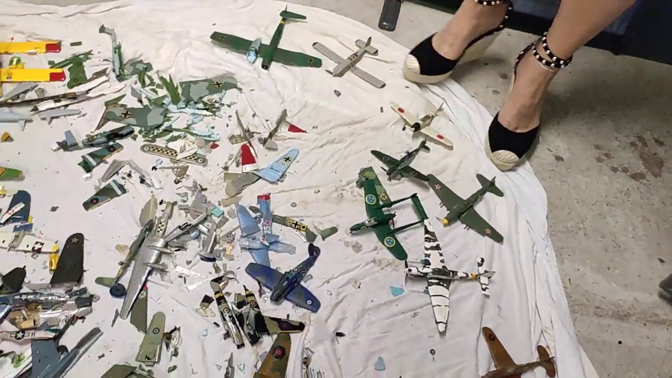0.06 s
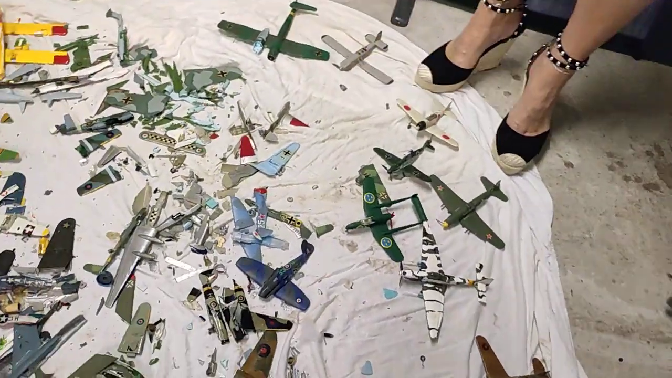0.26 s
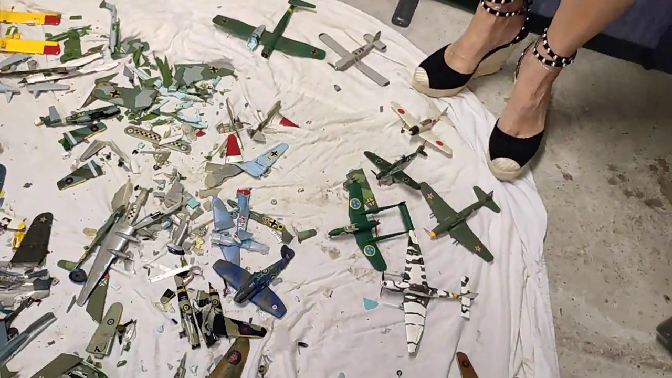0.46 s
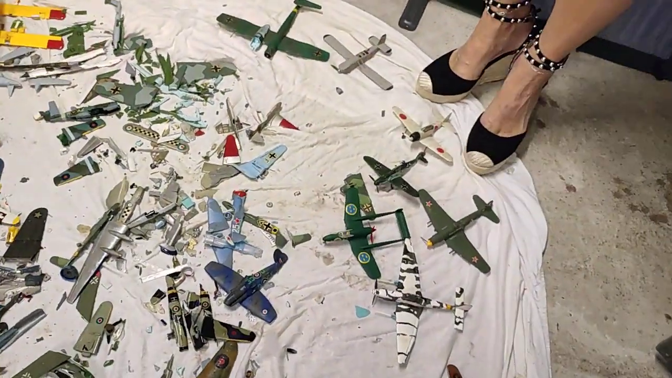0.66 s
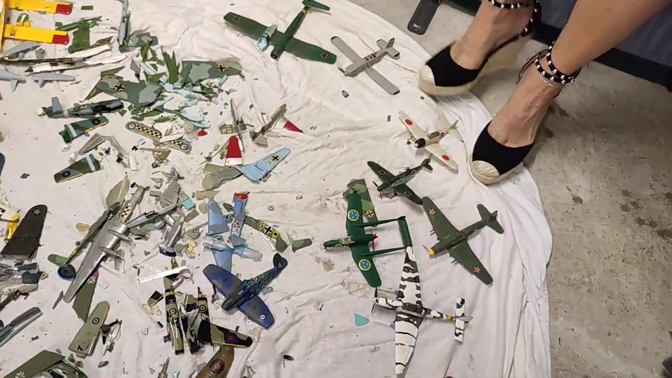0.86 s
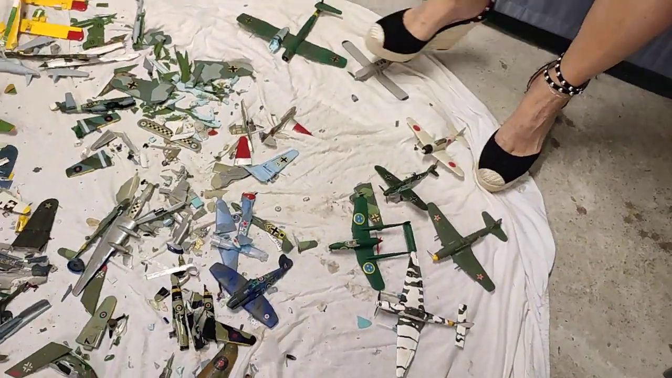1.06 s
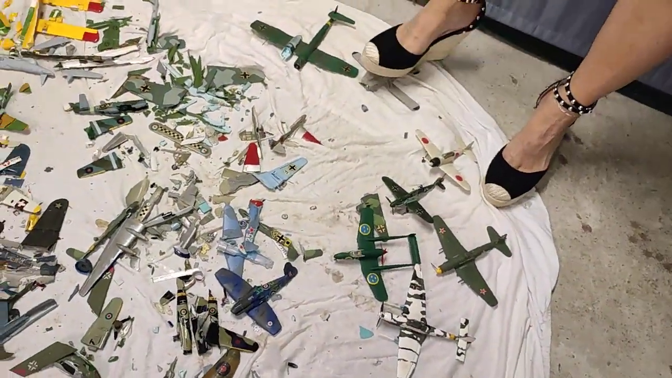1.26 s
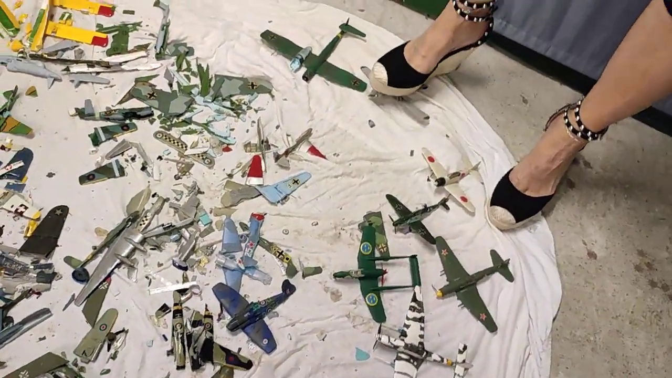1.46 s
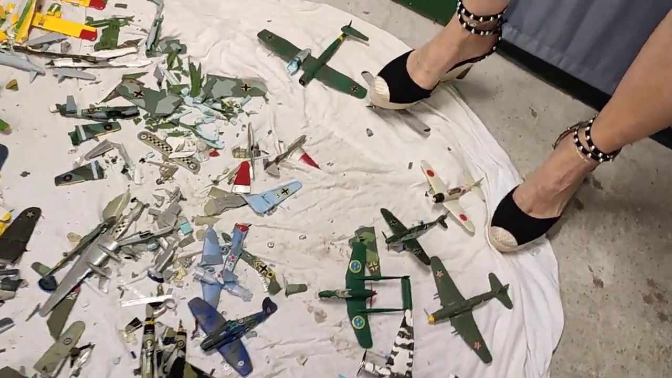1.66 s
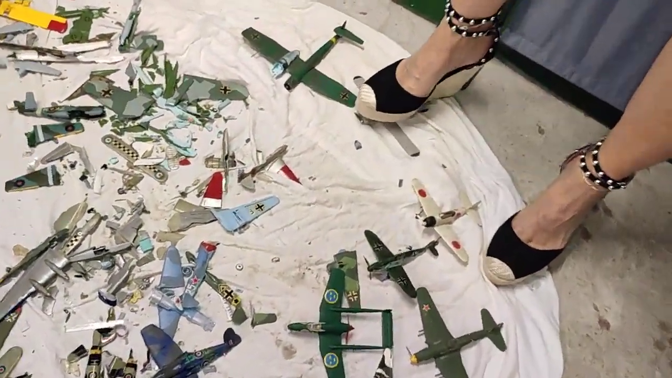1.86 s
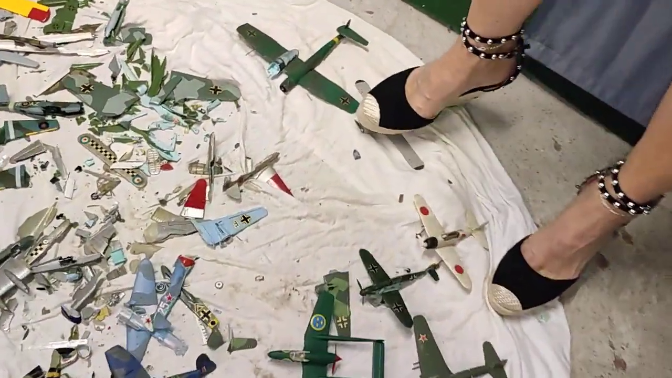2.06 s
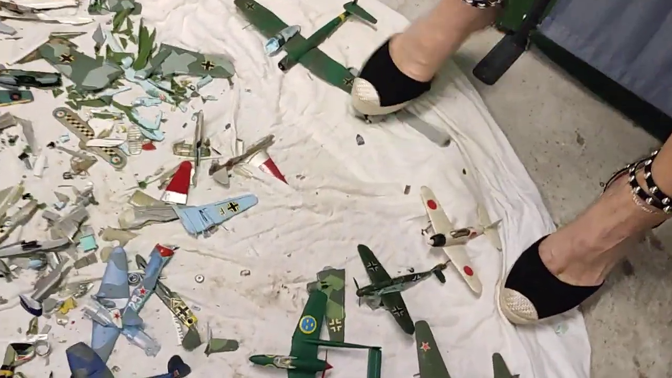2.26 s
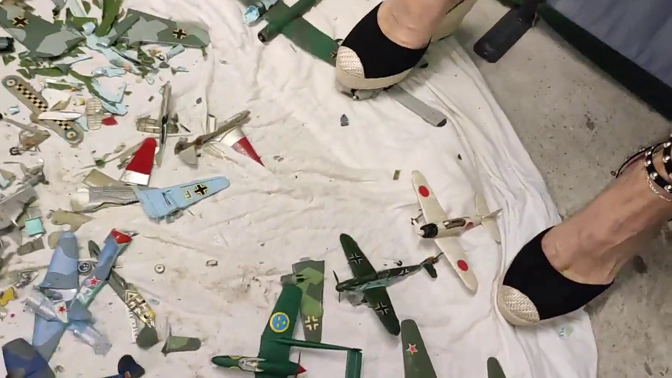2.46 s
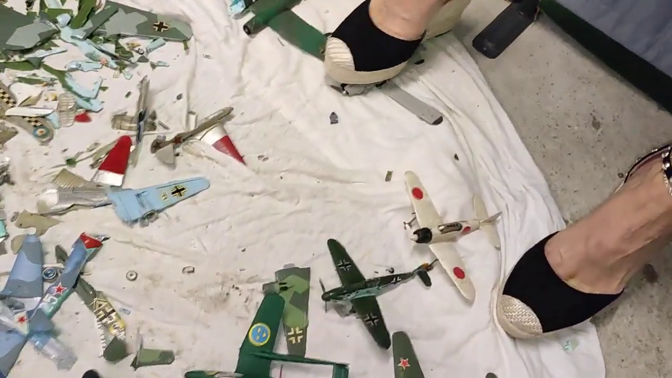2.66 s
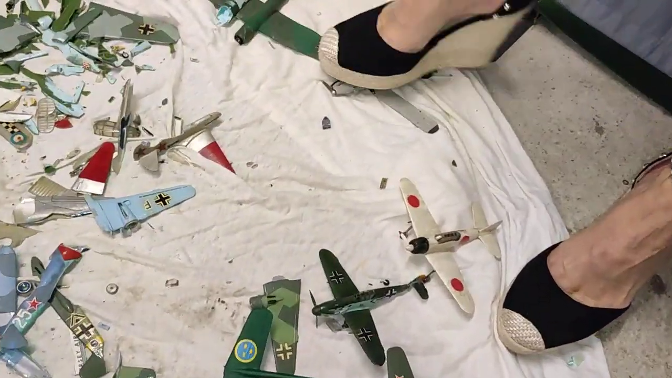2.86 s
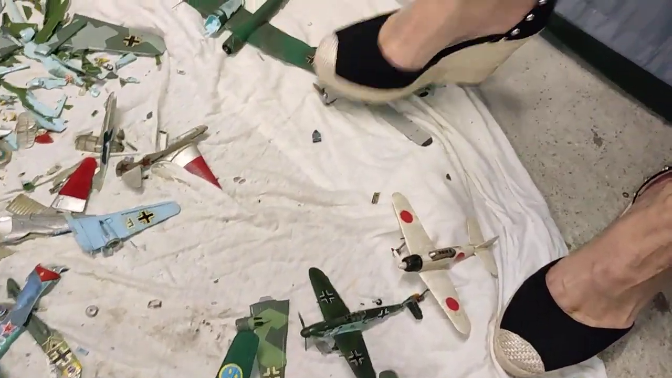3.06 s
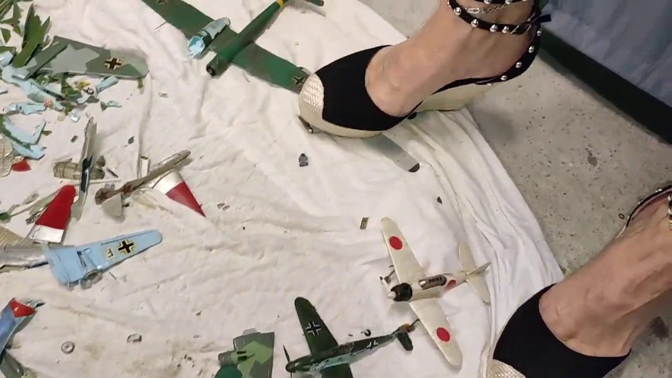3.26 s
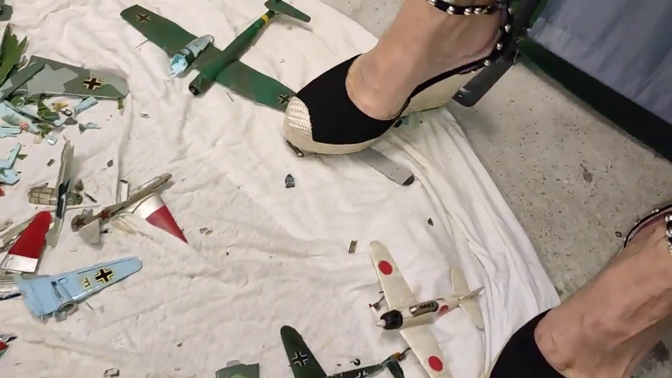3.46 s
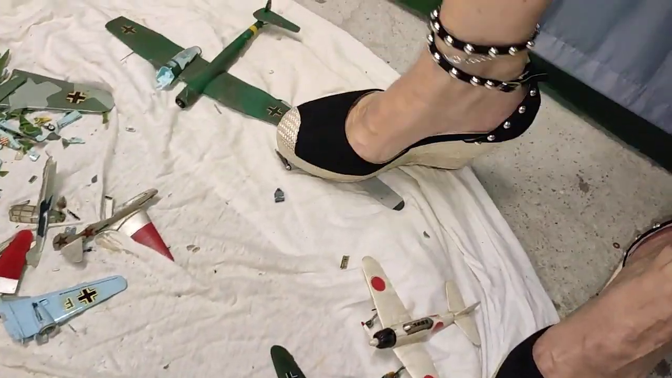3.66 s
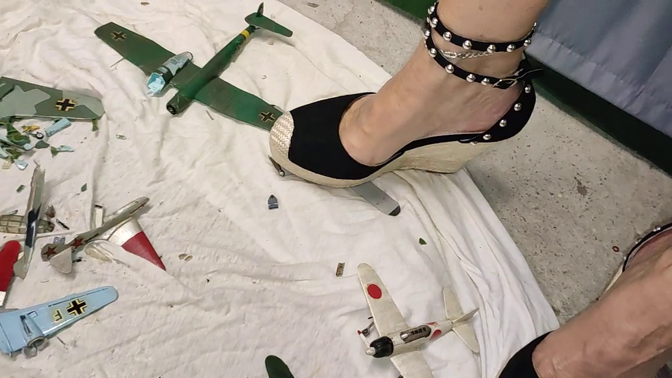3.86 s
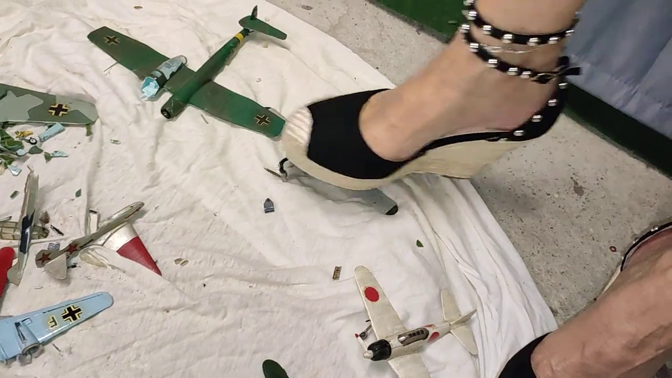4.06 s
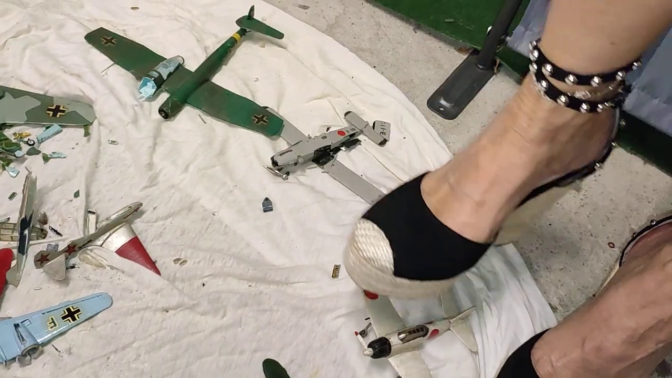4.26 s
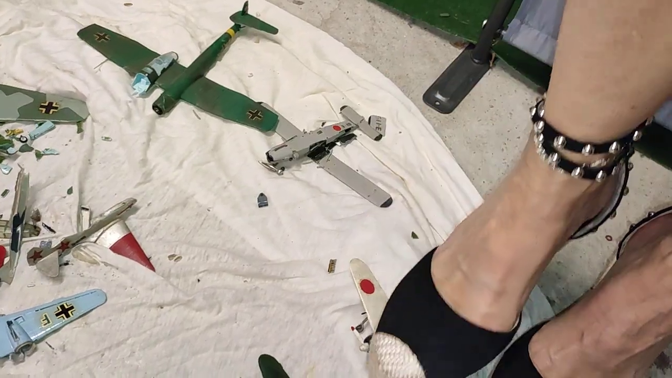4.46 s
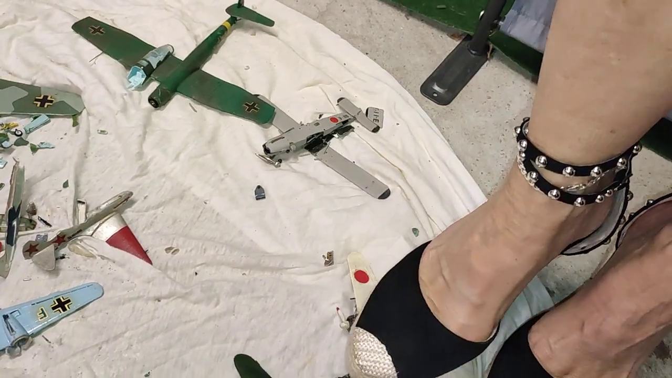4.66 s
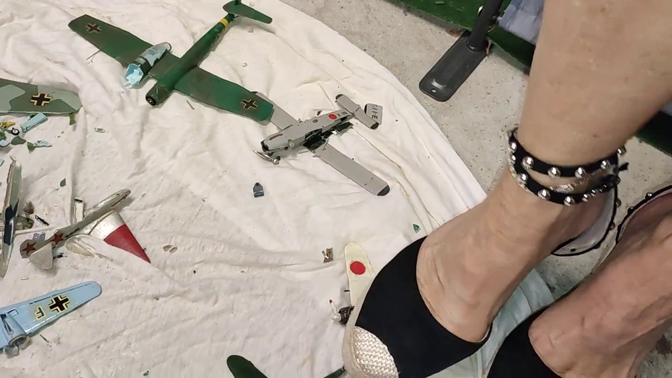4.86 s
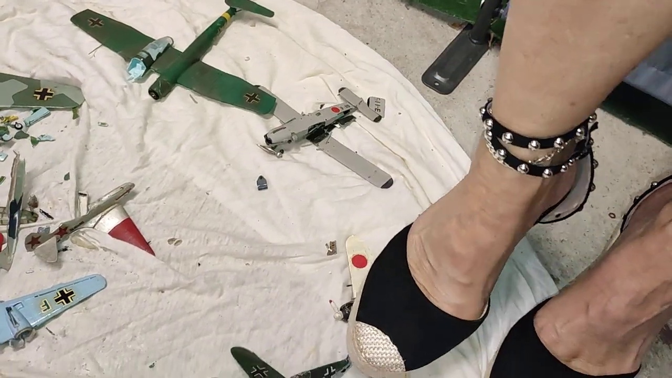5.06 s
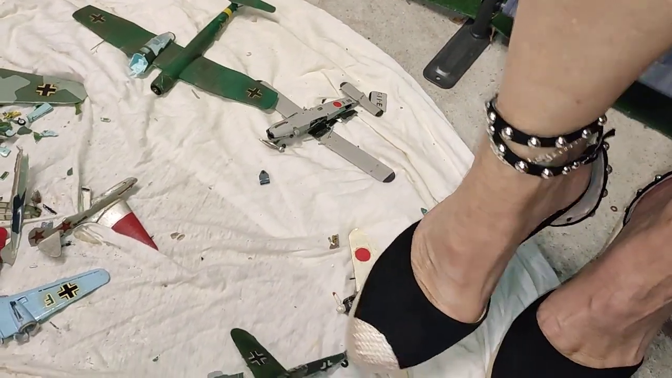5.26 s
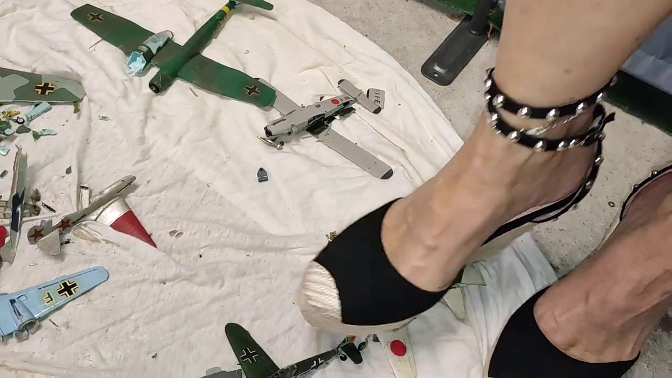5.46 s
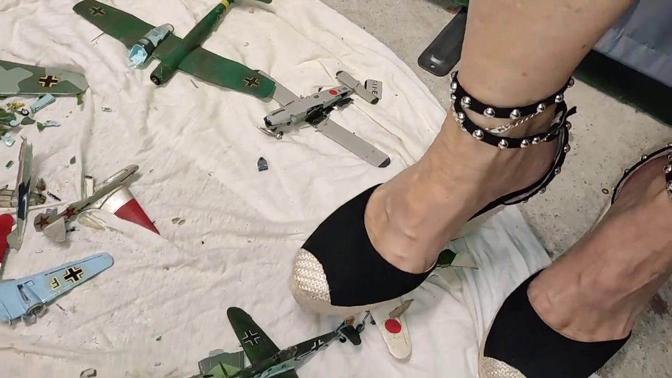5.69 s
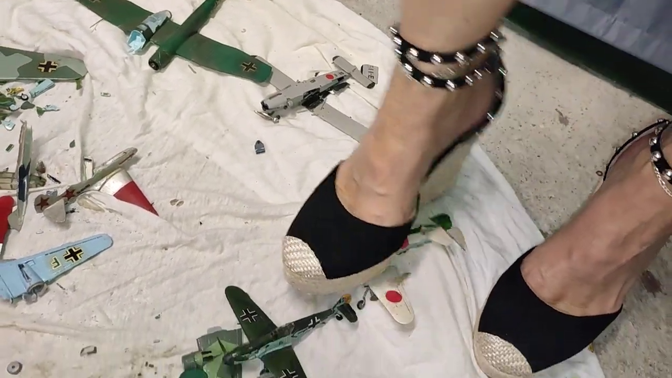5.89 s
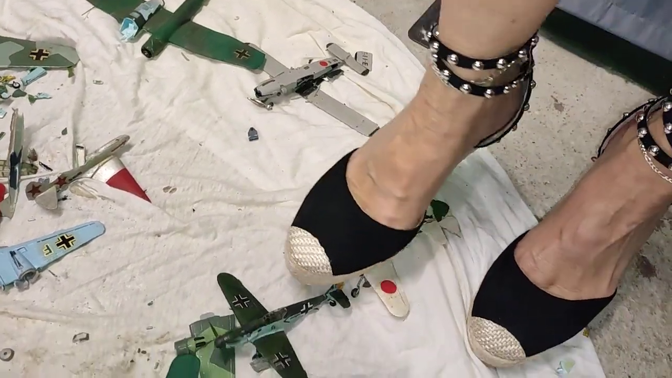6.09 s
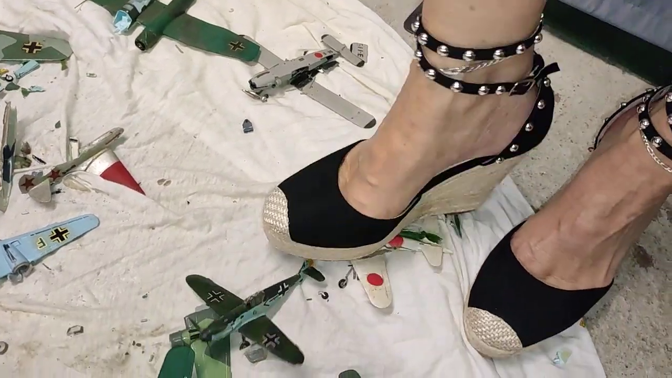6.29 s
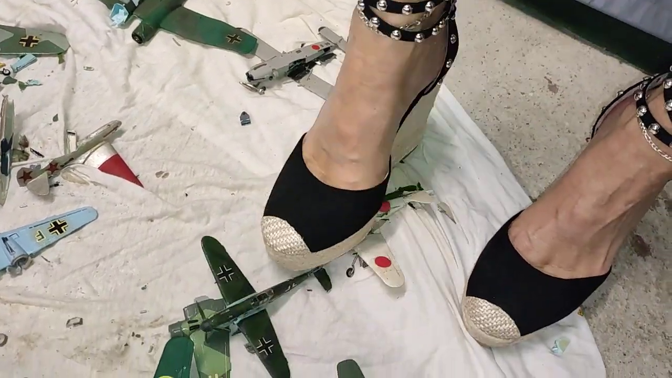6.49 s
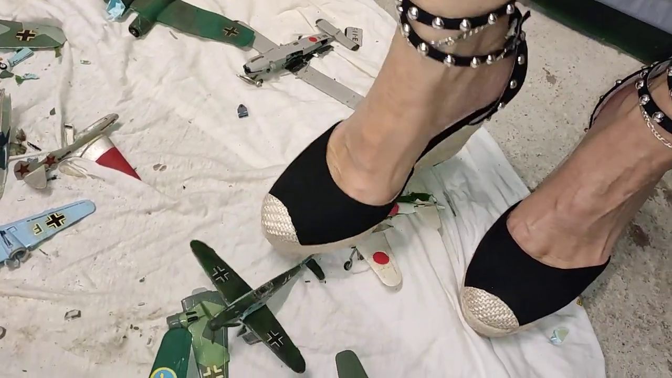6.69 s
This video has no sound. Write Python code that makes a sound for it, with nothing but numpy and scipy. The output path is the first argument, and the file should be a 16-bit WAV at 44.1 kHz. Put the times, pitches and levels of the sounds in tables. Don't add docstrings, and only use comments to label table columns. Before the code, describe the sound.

Soles shuffle gently over cloth and grit, then step hard on a plastic toy: dry snaps, a bright rip, low thumps. Shards tick and crumble as the pressure eases, fading nearly to nothing. A second toy is crushed with the sharpest crack of all, then scattered snaps and crunching. Small concrete room, close camera microphone with slightly different left and right colour, faint mains hum.

```python
import sys
import numpy as np
from scipy import signal
from scipy.fft import rfft, irfft, next_fast_len
from scipy.io import wavfile

SR = 44100
rng = np.random.default_rng(int(sys.argv[2]) if len(sys.argv) > 2 else 0)


def unload_audio(sound):
    columns = np.transpose(np.atleast_2d(sound))
    steps = np.round(np.clip(columns, -1, 1) * 32767)
    wavfile.write(sys.argv[1], SR, steps.astype(np.int16))


def ratio_of_db(decibels):
    return 10 ** (np.asarray(decibels, float) / 20)


N = 296793


def rms_one(x):
    return x / np.sqrt(np.mean(x ** 2) + 1e-20)


def energy(x):
    return np.sqrt(np.sum(x ** 2) + 1e-20)


def energies(x):
    ports = energy(x[:2])
    return np.array([[ports], [ports], [np.sqrt(2) * energy(x[2])]])


def in_time(rows):
    s, *columns = np.transpose(rows)
    return [np.interp(np.arange(N) / SR, s, c) for c in columns]


def at_hz(points, hz):
    table_hz, value = np.transpose(points)
    return np.interp(np.log(hz), np.log(table_hz), value)


def band(x, low_hz, high_hz):
    edges = signal.butter(2, [low_hz, high_hz], "band", fs=SR, output="sos")
    return signal.sosfilt(edges, x + 1e-18)


def port(x, resonances):
    for hz, width_hz, db in resonances:
        w, g = 2 * np.pi * hz / SR, ratio_of_db(db / 2)
        a = np.tan(np.pi * width_hz / SR)
        x = signal.lfilter([1 + a * g, -2 * np.cos(w), 1 - a * g],
                           [1 + a / g, -2 * np.cos(w), 1 - a / g], x)
    return x


def drift(rate_hz):
    r = np.exp(-2 * np.pi * rate_hz / SR)
    wander = signal.lfilter([1], [1, -2 * r, r * r], rng.standard_normal(N + SR))
    return rms_one(wander[SR:])


def at_both_ports(shared, own):
    alike_below_hz = 1550
    low = signal.butter(2, alike_below_hz, fs=SR, output="sos")
    high = signal.butter(2, alike_below_hz, "high", fs=SR, output="sos")
    return signal.sosfilt(low, shared + 1e-18) + signal.sosfilt(high, own + 1e-18)


def pair_noise(size):
    white = rng.standard_normal((3, size))
    return at_both_ports(white[0] + 0.77 * white[1:], white[1:])


# pitch_hz, level_db (per Hz)
AIR_TONE = [(24, -30.5), (40, 8), (86, -6), (140, -3), (306, -12.5), (739, -24), (1540, -20.5), (2580, -30),
            (3380, -33), (14000, -19)]
# time_s, level_db
HUM_LEVEL = [
    (0.0, -73),
    (2.89, -58.5),
    (6.73, -59),
]


def air():
    hz = np.maximum(np.fft.rfftfreq(N, 1 / SR), 1)
    still = rms_one(irfft(rfft(pair_noise(N)) * ratio_of_db(at_hz(AIR_TONE, hz)), N))
    rumble_db = [[-62.5], [-64.5]] + 3.0 * drift(3.7)
    rumble = rms_one(band(rng.standard_normal((2, N)), 7, 35)) * ratio_of_db(rumble_db)
    hum_db, = in_time(HUM_LEVEL)
    hum_hz = 99.2
    wave = np.sqrt(2) * np.sin(2 * np.pi * hum_hz * np.arange(N) / SR)
    hum = ratio_of_db(hum_db - 7.5 + 0.94 * drift(2.3)) * wave
    return ratio_of_db(-65) * still + rumble + hum


# start_s, peak_db, pitch_hz
FLOOR_THUMPS = [(0.214, -55, 190), (0.907, -61, 88), (1.771, -52, 200), (2.326, -61, 31.8),
                (2.34, -33.5, 20), (2.361, -45.5, 172), (2.421, -37, 29), (2.482, -49.5, 52),
                (2.76, -46, 28), (3.156, -40.5, 105), (4.646, -50, 87), (4.921, -44, 180), (4.904, -37, 30),
                (5.047, -38, 22), (5.199, -46, 71), (5.844, -66, 175), (6.047, -44.5, 132),
                (6.139, -47, 47)]


def thumps():
    t60_s = 0.099
    out, age = np.zeros((2, N + 8192)), np.arange(8192) / SR
    leans = rng.uniform(-1, 1, len(FLOOR_THUMPS))
    for (s, peak_db, hz), lean in zip(FLOOR_THUMPS, leans):
        at = round(s * SR)
        swing = ratio_of_db(peak_db - 60 * age / t60_s) * np.sin(2 * np.pi * hz * age)
        out[:, at:at + 8192] += swing * ratio_of_db([[9.2 * lean], [-4.0 * lean]])
    return out[:, :N]


# peak_s, length_s, dull_rub_db, gritty_rustle_db
SOLE_DRAGS = [(.0, 0.16, -70, -86.5), (0.24, 0.22, -64.5, -66), (0.525, 0.076, -76, -51),
              (0.62, 0.21, -64, -84), (0.86, 0.34, -72, -60.5), (1.014, 0.11, -59, -64),
              (1.243, 0.35, -58.5, -68.5), (1.505, 0.036, -75, -64), (1.627, 0.025, -59, -76),
              (1.657, 0.068, -53.5, -73), (1.714, 0.2, -54.5, -69.5), (1.877, 0.14, -52.5, -34.5),
              (2.175, 0.1, -48, -33), (2.402, 0.18, -44, -28.5), (2.896, 0.34, -45.5, -46),
              (3.106, 0.093, -56.5, -86), (3.296, 0.35, -50.5, -65), (3.703, 0.2, -59.5, -46.5),
              (4.076, 0.19, -61.5, -50.5), (4.428, 0.11, -53.5, -90), (4.702, 0.095, -43.5, -63),
              (4.96, 0.3, -45.5, -32.5), (5.304, 1, -73, -58.5), (5.716, 0.18, -55.5, -52),
              (5.914, 0.095, -43.5, -38), (6.273, 0.15, -91, -40), (6.522, 0.2, -47, -42)]


def drags():
    rise_db, fall_db = 28, 21.5
    t, out = np.arange(N) / SR, 0
    for s, length, *peak_db in SOLE_DRAGS:
        away = (t - s) / length
        swell = ratio_of_db(np.minimum(rise_db * away, -fall_db * away))
        out = out + np.outer(ratio_of_db(np.array(peak_db)), swell)
    return out


def rubbing():
    rub, grit = drags()
    dull = rms_one(band(band(pair_noise(N), 170, 2200), 150, 2400))
    strength = np.minimum(rng.exponential(1, N), 3)
    grains = 1 + strength * (rng.random(N) < .006) * 1.5
    rustle = rms_one(band(grains * pair_noise(N), 1300, 8000))
    return dull * rub * ratio_of_db(-4.0 + 4.4 * drift(15)) + rustle * grit * ratio_of_db(-8.5 + 2.4 * drift(40))


# start_s, peak_db, pitch_hz, length_s
SHOE_CREAKS = [(0.023, -50.5, 492, 0.11), (0.187, -80, 1080, 0.064), (0.577, -59, 423, 0.087),
               (0.7, -55.5, 600, 0.15), (0.873, -48.5, 492, 0.093), (1.033, -56, 595, 0.056),
               (1.158, -51, 436, 0.18), (1.46, -69, 1310, 0.066), (1.601, -55, 455, 0.12),
               (2.929, -42.5, 1223, 0.22), (6.528, -50, 376, 0.17)]
CREAK_TONES_DB = [2.5, -16, -11, -18]


def creaks():
    out = np.zeros((2, N))
    for s, peak_db, hz, length in SHOE_CREAKS:
        at, size = round(s * SR), round(length * SR)
        slips, creak = rng.standard_normal(16384), 0
        for k, db in enumerate(CREAK_TONES_DB, 1):
            tone = band(slips, k * hz - 0.08 * hz, k * hz + 0.05 * hz)[-size:]
            creak = creak + ratio_of_db(db) * rms_one(tone)
        out[:, at:at + size] += ratio_of_db(peak_db - 14.5) * creak * np.hanning(size)
    return out


# start_s, level_db, low_hz, high_hz, t60_s (time to fade 60 dB)
FREED_SLIVERS = [
    (1.905, -41.5, 4930, 6320, 0.33),
    (2.862, -59, 4000, 5050, 0.12),
    (3.4667, -46.5, 3120, 5320, 0.22),
    (4.7195, -47, 6470, 7500, 0.29),
    (5.067, -22, 7060, 7850, 0.059),
    (6.155, -49, 2560, 3040, 0.22),
]


def springs():
    flick_db, flick_t60_s = 26.5, 0.011
    out, age = np.zeros((2, N + 16384)), np.arange(16384) / SR
    for s, db, low_hz, high_hz, t60 in FREED_SLIVERS:
        edges = signal.cheby1(5, 1, [low_hz, high_hz], "band", fs=SR, output="sos")
        buzz = rms_one(signal.sosfilt(edges, rng.standard_normal((2, 16384))))
        fade = ratio_of_db(db - 60 * age / t60) + ratio_of_db(db + flick_db - 60 * age / flick_t60_s)
        at = round(s * SR)
        out[:, at:at + 16384] += buzz * fade
    return out[:, :N]


# pitch_hz, t60_s (time to fade 60 dB)
ROOM_FADE = [(150, 0.75), (600, 0.29), (2000, 0.35), (5000, 0.27), (12000, 0.27)]
# pitch_hz, level_db
ROOM_TONE = [(160, 3.6), (640, 5), (2500, 6), (5000, 5), (10000, 3)]


def room(direct, all_round):
    age = np.arange(SR // 2) / SR
    white, edges, tail = pair_noise(len(age)), 80 * 2 ** np.arange(0, 8.1, 1), 0
    for low, high in zip(edges, edges[1:]):
        fade_db = 60 * age / at_hz(ROOM_FADE, np.sqrt(low * high))
        tail = tail + band(white, low, high) * ratio_of_db(at_hz(ROOM_TONE, low) - fade_db)
    tail *= 1 - np.exp(-age / .003)
    tail *= ratio_of_db(-8) / np.sqrt(np.sum(tail ** 2, axis=1, keepdims=True))
    lag = round(0.0029 * SR)
    echo = ratio_of_db(-13.5) * np.pad(direct, ((0, 0), (lag, 0)))[:, :N]
    return echo + signal.fftconvolve(all_round[None], tail, axes=1)[:, :N]


# start_s, shell_db, splinter_db, ring_hz, tear_ms
HULL_BURSTS = [(1.7815, -17.5, -1, 10300, 7.7), (1.8664, -10.5, -1, 6960, 0.44),
               (2.1498, -13.5, 1.5, 3650, 0.19), (2.26, -11, -1.5, 2640, 1.9), (2.372, -22, -9.5, 2910, 13),
               (2.7724, -9.5, 2.5, 10200, 1.87), (2.9856, -18.5, -9.5, 3340, 0.43),
               (3.6102, -16.5, -28, 3420, 0.37), (4.6612, -21.5, 5.5, 1210, 1),
               (4.669, -12.5, -17, 1240, 1.3), (4.7571, -12.5, 1, 8360, 1.3), (4.7612, -16, 2, 1570, 4.6),
               (4.8013, -11, -6, 2080, 4.96), (4.91, -9, 3.5, 7800, 1.06), (5.034, -19.5, 4.5, 9000, 0.5),
               (5.0637, -16.5, 11, 1155, 3.5), (5.0686, 0, -25, 7350, 1.03),
               (5.0715, -13.5, -15, 7500, 4.7), (5.0745, -9, -3, 7500, 1.9), (5.8647, -5, -2.5, 5170, 0.49),
               (6.1649, -26.5, 6, 1760, 0.77), (6.402, -21, -29, 3450, 2), (6.4255, -12, 3.5, 5500, 0.55)]
# start_s, shell_db, splinter_db, ring_hz, tear_ms
WING_BREAKS = [(1.7985, -8, 8, 6100, 0.69), (2.2365, -2.5, -34, 1250, 2.7), (2.2491, -9, -12, 1300, 1.3),
               (2.3262, -3.5, -8.5, 2360, 0.6), (2.3344, -17, 3.5, 4700, 0.47),
               (2.3405, -0.5, -9, 3330, 1.3), (2.6728, -3.5, -10.5, 2550, 1.26),
               (2.8652, -7.5, -4, 4370, 1.68), (2.879, -16, -10, 1700, 0.88),
               (3.1831, -19, -18.5, 2800, 9.9), (3.1973, -9, -13, 1210, 0.87), (4.6214, -14, 2, 9100, 2.7),
               (4.905, -6.5, -4, 6100, 0.59), (4.9881, -6, -4, 1980, 0.7), (5.0578, -7.5, 0.5, 8300, 1.15),
               (5.371, -14.5, -11.5, 2140, 0.3), (5.742, -8, -8, 2960, 2.2), (5.854, -15, 0.5, 8000, 2.7),
               (5.8961, -2.5, -1, 1750, 0.46), (5.9586, -26, 6, 2800, 0.99), (6.1554, -6, -7, 2700, 2),
               (6.4136, -14.5, 3.5, 3070, 1), (6.5017, -11, -0.5, 7500, 0.13),
               (6.7058, -11, -8.5, 2950, 2.15)]
# start_s, shell_db, splinter_db, ring_hz, tear_ms
STRUT_BREAKS = [(1.7769, -5, -18, 2300, 0.84), (2.32, -10, -13, 3240, 1.3), (2.3464, -7, -2, 8650, 4.6),
                (3.1694, -17.5, -6, 5100, 3.2), (3.466, -9.5, -17, 4200, 0.5),
                (3.5832, -23.5, -39, 3580, 2.4), (3.6441, -29, -27, 3440, 0.39),
                (4.6062, -26.5, 8.5, 2400, 1.6), (4.6936, -25, -2.5, 2560, 2.7),
                (4.783, -13, -7.5, 1190, 7.1), (4.8556, -6.5, -3.5, 7300, 2.3),
                (4.9262, -6.5, -3, 1210, 1.84), (5.396, -18, -13.5, 1950, 2.6),
                (5.4168, -29.5, -3, 3100, 1.5), (5.6082, -21.5, -6, 10600, 0.48),
                (5.713, -27, 8.5, 10400, 1.25), (5.9869, -15.5, -1, 2980, 0.9),
                (5.9954, -4.5, -31, 2500, 0.51), (6.1211, -18, -19, 8900, 0.89),
                (6.1426, -11.5, -33, 1600, 0.46), (6.2461, -18.5, 8.5, 2900, 0.14),
                (6.359, -19, -3, 8550, 1.7), (6.384, -1.5, -1.5, 10900, 0.33),
                (6.6739, -21, -36, 2780, 2.5)]
# start_s, shell_db, splinter_db, ring_hz, tear_ms
LONG_RIPS = [
    (.131, -56.5, -22, 2770, 3.0),
    (1.766, -49, 1, 2550, 10),
    (2.343, -11.5, -10, 5100, 13),
    (3.16, -32, -2, 5000, 73),
    (3.172, -19, -4, 3200, 4.5),
    (4.128, -44, 0.5, 4080, 21),
    (4.566, -42.5, -7, 3280, 28),
    (4.6015, -41.5, 14, 2230, 6),
    (6.657, -26, -38, 2780, 3.2),
]
# start_s, shell_db, contact_ms
FLOOR_KNOCKS = [
    (2, -50, 1.1),
    (3.3468, -59, 2.6),
    (4.0414, -47.5, 2.4),
    (4.4134, -62, 6),
]
# start_s, shell_db, splinter_db, ring_hz
SHARD_CRUNCHES = [(1.9058, -31, 9.5, 5740), (2.1129, -19.5, -11, 5600), (2.3381, -22, 9.5, 4070),
                  (3.6309, -25, -4.5, 2700), (3.6972, -36.5, -1, 6270), (3.7123, -32, -20, 5340),
                  (3.7337, -35, -16, 1220), (3.7405, -33, -21, 1690), (3.7664, -30.5, -19, 3970),
                  (4.078, -24.5, -9.5, 3740), (4.2999, -50, 5, 6930), (4.32, -58, 11.5, 6060),
                  (4.7222, -37, 16.5, 6860), (4.893, -36, 12, 6360), (5.2935, -44, -8, 1000),
                  (5.6356, -29.5, -1.5, 10300), (5.6927, -25, -9, 980), (5.7558, -17, -8.5, 7800),
                  (5.983, -30, 9, 2950), (6.0017, -21, -17, 4820), (6.2831, -17.5, -4, 10100),
                  (6.3329, -32.5, 10, 10500), (6.4543, -26, 5.5, 1300)]
# start_s, shell_db, splinter_db, ring_hz
SHARD_TICKS = [(2.1306, -16, -18, 2770), (2.2126, -40, 15.5, 4600), (2.5882, -39, 13.5, 10380),
               (3.4475, -28.5, -39, 1046), (3.5365, -37, 1, 6140), (3.5445, -28.5, -3.5, 2900),
               (3.5962, -33, -17, 1400), (3.6784, -31.5, -7.5, 5000), (3.7844, -28, -28.5, 2390),
               (4.0289, -43, -21, 1390), (4.0459, -33, -12, 1400), (4.0871, -29, -3, 10450),
               (4.272, -53, -7, 2980), (4.3745, -48.5, 4.5, 4650), (4.852, -33, 14, 7160),
               (4.9663, -28, 0, 4500), (5.3216, -43, -19, 2780), (5.3636, -38, 0, 1690),
               (5.4027, -20, -24, 4600), (5.4154, -22, -6.5, 3240), (5.448, -34.5, 2, 2870),
               (5.5012, -40, -3, 3280), (5.5664, -38, 4.5, 3160), (5.583, -28, -6, 2250),
               (5.7933, -30.5, -1.5, 5470), (6.091, -35, -2, 6500), (6.128, -29.5, 7.5, 6500),
               (6.2325, -26.5, -22, 2770), (6.2712, -25, -11, 8610), (6.6389, -29.5, 5, 8200)]
# start_s, shell_db, splinter_db, ring_hz
TOY_CRUMBS = [(2.1185, -28, -51, 1270), (2.1378, -29, -3, 2750), (2.1722, -36, 8, 8230),
              (2.2279, -48, -14, 2800), (2.2831, -26.5, -11.5, 2480), (2.2955, -23, -14, 3190),
              (2.3139, -28, -10, 1940), (2.4665, -36.5, 7.5, 9100), (2.4976, -27, -20, 2350),
              (2.5072, -27, -24, 3600), (2.5172, -32, -24, 1340), (2.6849, -17.5, -10, 2180),
              (2.7432, -33, -4, 2070), (2.8134, -25, -15, 1660), (2.9324, -31, -5, 2230),
              (3.114, -68.5, 16.5, 4840), (3.208, -33, -10, 1540), (3.2425, -30, -14, 1160),
              (3.289, -44.5, -23, 1104), (3.4785, -34, -11, 4570), (3.503, -33.5, -23, 1480),
              (3.6347, -28, -20, 4190), (3.6392, -39, -23, 1680), (3.6625, -38.5, -12.5, 1570),
              (3.728, -41.5, -5, 7020), (3.9941, -49.5, -23, 2460), (4.0928, -31, -14, 8470),
              (4.1199, -39, -13, 5200), (4.1265, -45, -3, 8570), (4.1424, -33, -15, 2690),
              (4.2946, -49, -14.5, 3330), (4.3064, -47, -15, 3060), (4.326, -42.5, -14.5, 4320),
              (4.641, -32, 6.5, 4460), (4.654, -28, -5, 5600), (4.658, -32.5, 7, 5730),
                     (4.6817, -31, -5, 3620), (4.689, -16.5, -19, 4350), (4.712, -28.5, 4, 6850),
                     (4.7262, -23.5, 2, 6980), (4.795, -32, 0, 5250), (4.829, -27, -6, 3660),
                     (4.9456, -24, 2, 6030), (4.9953, -38, -10, 7800), (5.0761, -15, -12, 7700),
                     (5.1649, -24, -44, 2820), (5.176, -26, -22, 2970), (5.1851, -23.5, -29, 3270),
                     (5.17, -25, -30, 2720), (5.3392, -42, -10, 5700), (5.3583, -37, -19, 2370),
                     (5.3652, -32, -11, 1510), (5.3774, -29, -27, 3400), (5.383, -37, -20, 2600),
                     (5.3904, -29, -7, 2400), (5.4015, -27, -4, 2450), (5.4096, -27, -19, 3060),
                     (5.4133, -26, -8, 2880), (5.485, -43, 2.5, 8000), (5.505, -39, -17, 2560),
                     (5.5127, -39, -12, 7110), (5.5953, -28, -27, 3270), (5.619, -37, -19, 1210),
                     (5.6425, -40.5, 5, 8350), (5.77, -27, -11, 2960), (5.825, -34, -16, 2890),
                     (5.8306, -36, -20, 2410), (5.911, -33, -8, 3060), (6.057, -34, -15, 4520),
                     (6.064, -42, -17, 2180), (6.0748, -54, -23, 2410), (6.147, -29, 0, 6030),
                     (6.1686, -21, -15, 2600), (6.1975, -35, -13, 4950), (6.251, -34, 2, 2630),
                     (6.255, -36, -4, 2700), (6.304, -29, -15, 4090), (6.3355, -29, -17, 2670),
                     (6.3715, -47, -8, 5000), (6.5147, -25, -8, 5800), (6.5185, -31, -20, 5990),
                     (6.5357, -33, -19, 3270), (6.563, -41, -19, 1430)]
PART_THUD_DB = {"hull": -6, "wing": -27, "strut": -49.5, "crunch": -21, "tick": -39.5, "rip": -29, "knock":
                15, "crumb": -30.5}


def shards(rows, tear_ms):
    halves_per_db = .015
    return [(*row, tear_ms * 2 ** (-halves_per_db * row[2])) for row in rows]


def fractures():
    knock_splinter_db, knock_hz = -17, 1175
    knocks = [(s, db, knock_splinter_db, knock_hz, ms) for s, db, ms in FLOOR_KNOCKS]
    parts = {"hull": HULL_BURSTS, "wing": WING_BREAKS, "strut": STRUT_BREAKS,
             "rip": LONG_RIPS, "knock": knocks,
             "tick": shards(SHARD_TICKS, 2), "crunch": shards(SHARD_CRUNCHES, 1.12),
             "crumb": shards(TOY_CRUMBS, 2)}
    breaks = []
    for part, rows in parts.items():
        breaks += [(s, db, PART_THUD_DB[part], *rest) for s, db, *rest in rows]
    return breaks


def cracks():
    breaks = fractures()
    out, age = np.zeros((3, N + 2048)), np.arange(2048) / SR
    chance = rng.standard_normal((len(breaks), 3, 2048))
    paths = at_both_ports(chance[:, :1], chance[:, 1:] + 0.057 * chance[:, :1])
    ranges = [signal.butter(1, edges_hz, "band", fs=SR, output="sos")
              for edges_hz in [(70, 400), (650, 2000), (1750, 3500), (4600, 17000)]]
    for (s, shell_db, thud_db, splinter_db, hz, tear_ms), draw, path in zip(breaks, chance, paths):
        swell = age / (min(tear_ms, 3) / 1000 * 0.22)
        fade = np.exp(-(age / (0.83 * tear_ms / 1000)) ** 0.97)
        shape = (1 - np.exp(-swell ** 2)) * fade
        shape /= shape.max()
        all_round = shape * draw[0] if tear_ms > 5 else 1. * (age == 0)
        clear = (hz, 0.12 * hz, 1.5 * max(splinter_db - 9.5, 0))
        ringing = np.vstack([port(shape * path, [(hz, 0.32 * hz, 10.5), clear]),
                             port(all_round, [(hz, 0.17 * hz, 8.0), clear])])
        push = np.vstack([shape * (draw[0] + 0.6 * draw[1:]), all_round])
        boom, thud, shell, splinters = map(signal.sosfilt, ranges, [push, push, ringing, ringing])
        body = ratio_of_db(thud_db - 6.5) * (thud + ratio_of_db(-3.5) * boom) / energies(thud)
        heard = port(shell, RIGHT_EAR[:1])
        shell *= ratio_of_db(-5.5) / np.array([[energy(heard[1])], [energy(heard[1])], [energy(heard[2])]])
        splinters *= ratio_of_db(splinter_db + 3.5) / energies(splinters)
        at = round(s * SR)
        out[:, at:at + 2048] += ratio_of_db(shell_db) * energy(shape) * (body + shell + splinters)
    return out[:2, :N], out[2, :N]


# time_s, left_lean_db
BALANCE_LEAN = [
    (0.0, -0.5),
    (1.7, 1.25),
    (2.2, 2),
    (3.0, 0.66),
    (3.7, -0.9),
    (4.6, 0.7),
    (5.2, 0.9),
    (6.0, 1),
    (6.73, 0),
]


def scene():
    plastic, all_round = cracks()
    around = room(plastic, all_round) + rubbing() + creaks() + springs() + thumps() + air()
    dulling = signal.cheby2(10, 40, 14600, fs=SR, output="sos")
    lean_db, = in_time(BALANCE_LEAN)
    return ratio_of_db([lean_db, -lean_db]) * (plastic + signal.sosfilt(dulling, around))


# pitch_hz, width_hz, level_db
LEFT_EAR = [(231, 120, 2.5), (7500, 3700, 3), (600, 170, 2.5), (10240, 1800, -12), (3200, 540, -2),
            (133, 66, 0.5)]
# pitch_hz, width_hz, level_db
RIGHT_EAR = [(2780, 950, 13), (4600, 12040, 5.5), (8550, 1140, -22.5), (7500, 820, -10), (9240, 1200, -12),
             (12140, 4100, -8.5), (2780, 320, -0.5)]


def microphone_ports(dry):
    return np.array([ratio_of_db(-1.5) * port(dry[0], LEFT_EAR), port(dry[1], RIGHT_EAR)])


# pitch_hz, level_db
TREBLE_FALL = [(13900, -0.02), (14300, -11), (14800, -21), (15500, -28), (16500, -39.5)]


def end_of_treble(x):
    size = next_fast_len(N)
    hz = np.fft.rfftfreq(size, 1 / SR) + 1
    x = irfft(rfft(x, size) * ratio_of_db(at_hz(TREBLE_FALL, hz)), size)[:, :N]
    return signal.sosfilt(signal.cheby2(18, 60, 16850, fs=SR, output="sos"), x)


def low_pass(x):
    return signal.sosfilt(signal.butter(12, 16630, fs=SR, output="sos"), x)


def record(dry):
    x = microphone_ports(dry)
    x = .8 * np.tanh(x / .8)
    return low_pass(end_of_treble(x))


dry = scene()
out = record(dry)
unload_audio(out)
```